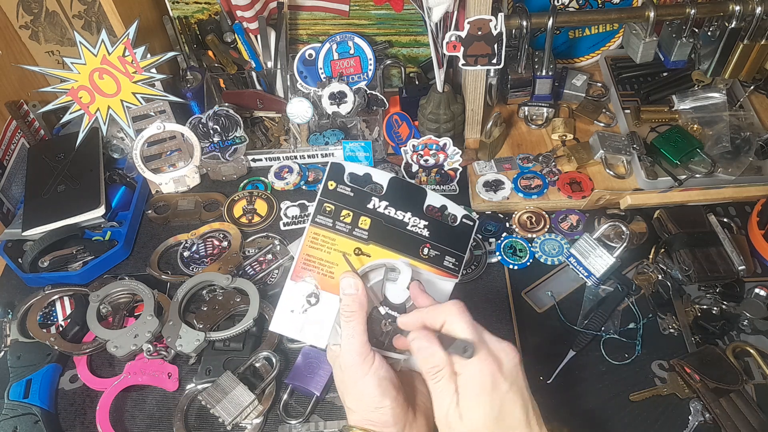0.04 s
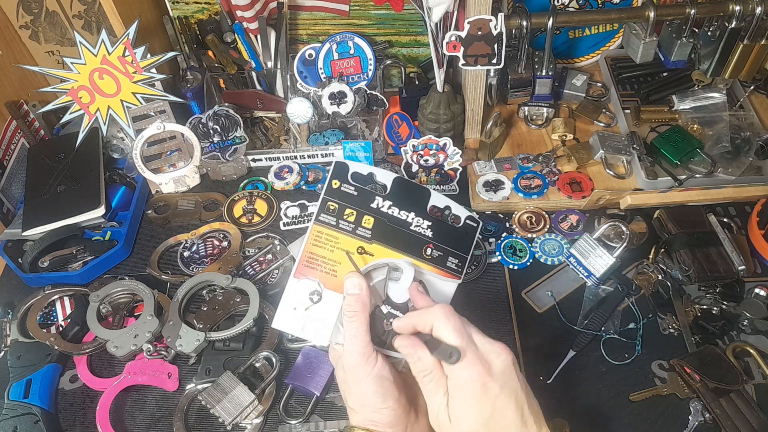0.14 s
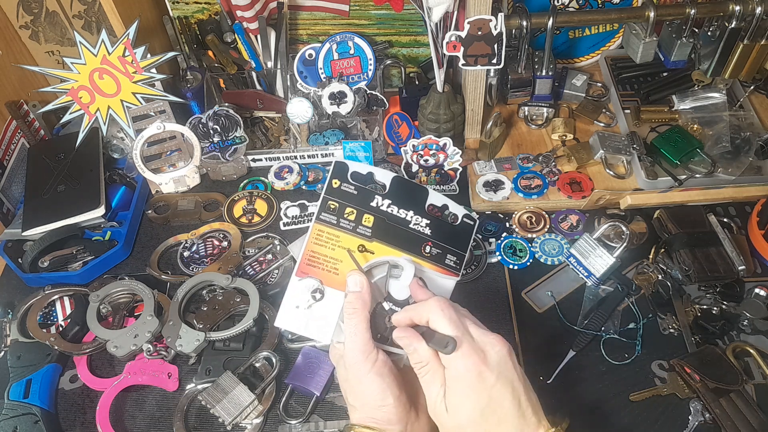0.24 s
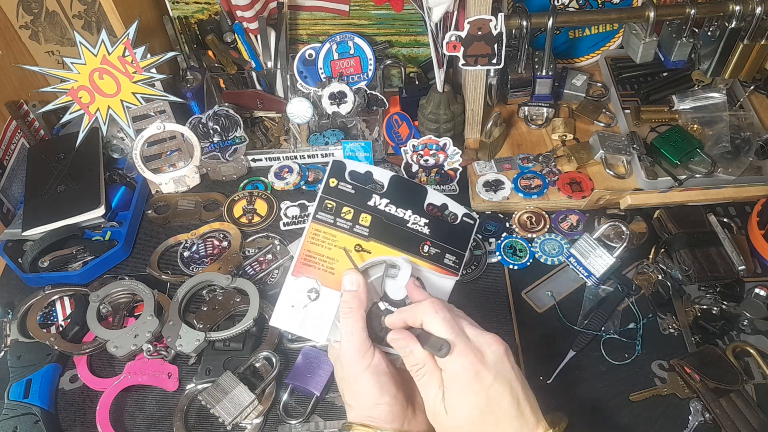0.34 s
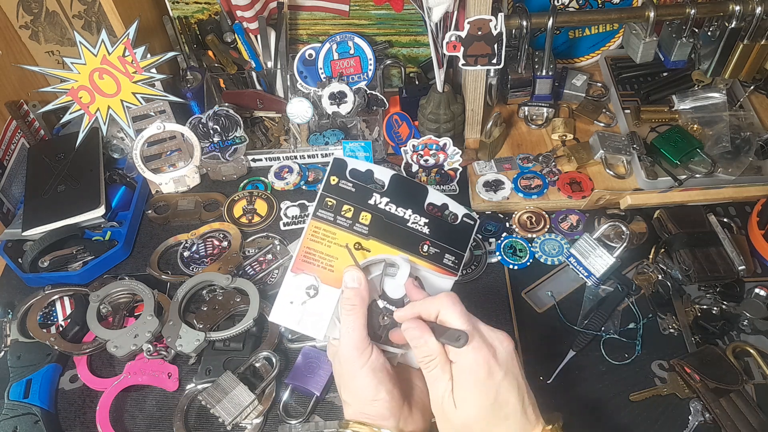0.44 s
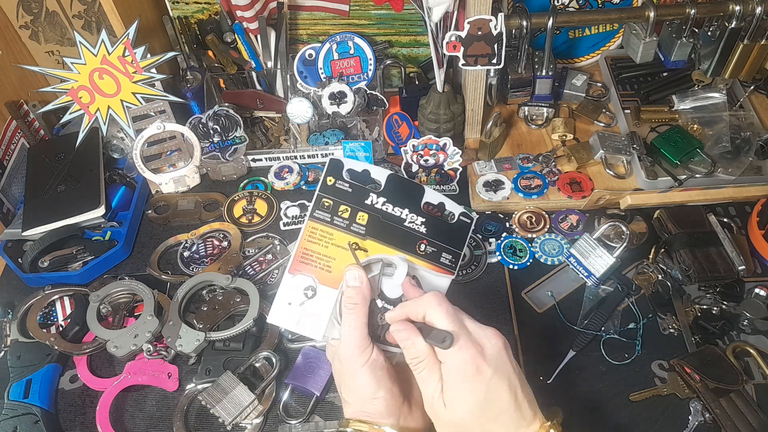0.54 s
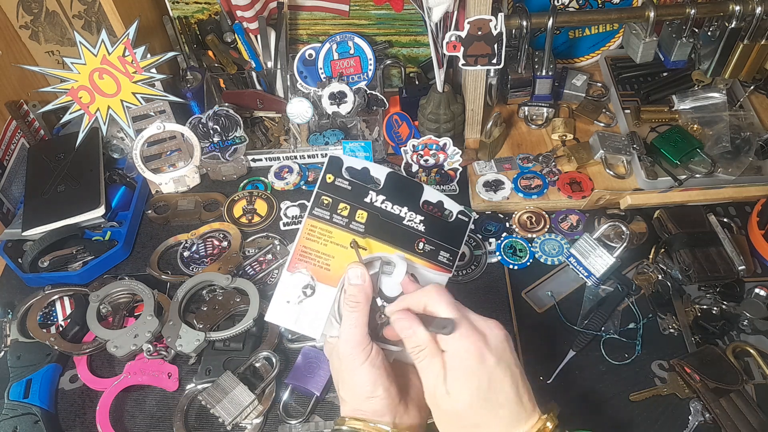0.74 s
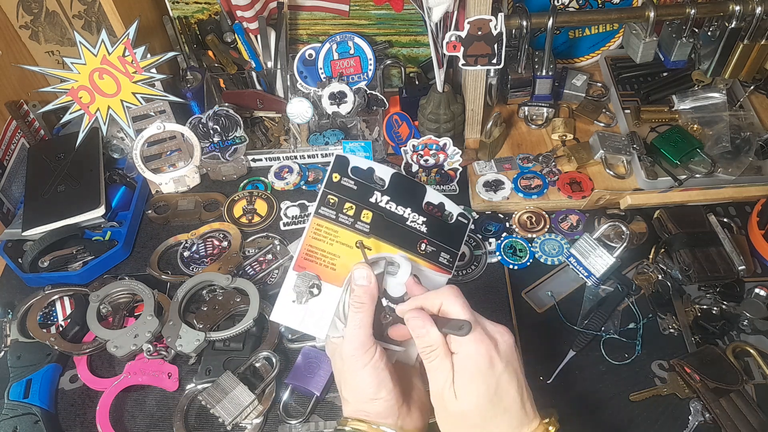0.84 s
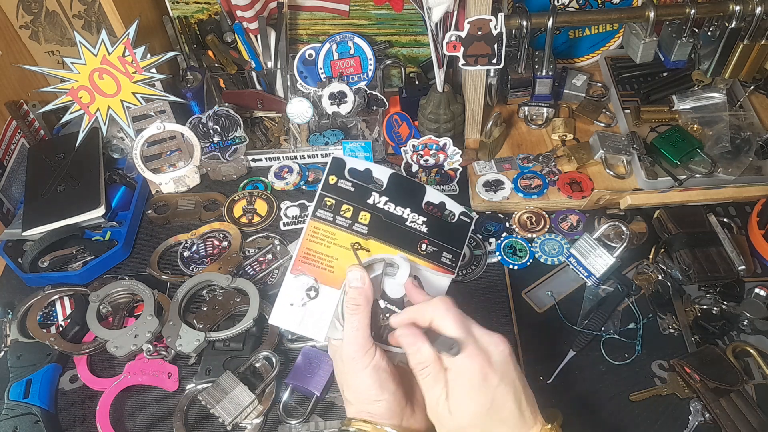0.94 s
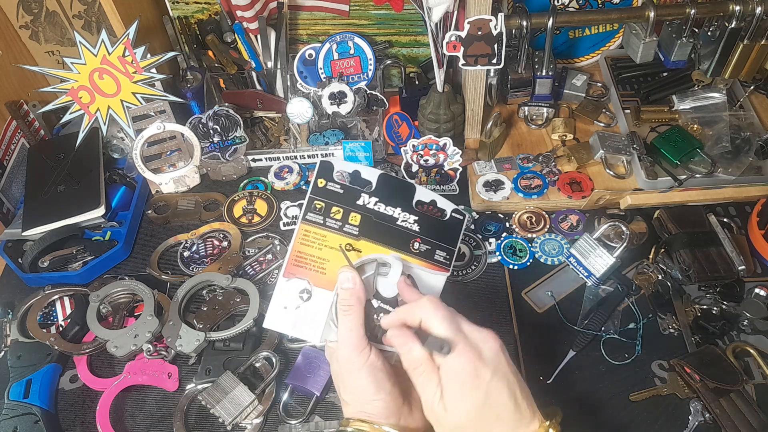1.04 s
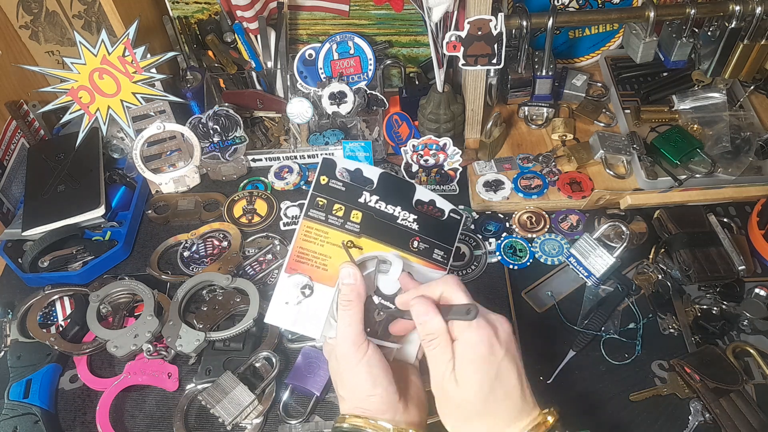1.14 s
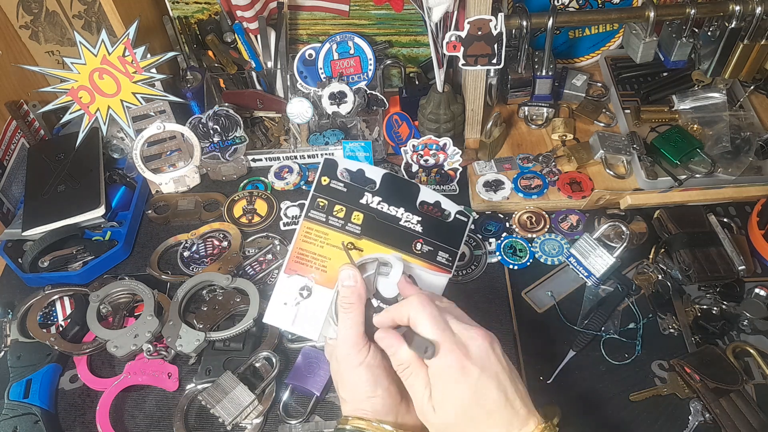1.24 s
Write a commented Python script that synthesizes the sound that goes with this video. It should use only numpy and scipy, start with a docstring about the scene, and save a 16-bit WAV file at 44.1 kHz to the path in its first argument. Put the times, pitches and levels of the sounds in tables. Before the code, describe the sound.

Pins snap and click inside a padlock as a metal pick scrapes over them in quick, irregular strokes, each ringing briefly. A tiny high squeak comes near the start, and hands rustle faintly on cardboard, close up indoors.

```python
"""A steel pick rakes through a hand-held padlock, close-miked in a small room.
Each stroke is a gritty stick-slip scrape over the pins, which snap back and ring the lock's body.
The pick gives one stuttering squeak, steel on steel, and ticks between strokes.
Underneath, hands rustle softly on the lock's card over a low hum and faint hiss."""
import sys
import numpy as np
from scipy import signal
from scipy.fft import rfft, irfft
from scipy.io import wavfile
from scipy.ndimage import uniform_filter1d

SR = 44100
rng = np.random.default_rng(int(sys.argv[2]) if len(sys.argv) > 2 else 0)


def wrap_up_sound(samples):
    """Save the sound to the file named by the first command line argument, as 16-bit audio."""
    columns = np.atleast_2d(samples).T
    # keep every value between -1 and 1, then stretch to whole-number steps
    tamed = np.clip(columns, -1, 1)
    steps = np.round(tamed * 32767).astype(np.int16)
    wavfile.write(sys.argv[1], SR, steps)


N = 57330

# EQ points of a contact, in the order low body, knock, body, treble, top: f/Hz
CONTACT_BANDS = (900, 2400, 3500, 7000, 13000)
# pick dragging over pins and wards: t/s, length/s, knock/dB, body/dB, treble/dB, top/dB, pan left/dB
PICK_DRAGS = [ (.000, 0.023, -57.5, -55, -51.5, -58.5, 4), (0.164, 0.006, -44.5, -55.5, -53, -58, 13),
              (0.177, 0.026, -53.5, -59, -58.5, -70, 2), (0.2128, 0.013, -34, -42.5, -38.5, -33, 3),
              (0.225, 0.0079, -13, -19, -24.5, -27.5, 3.5), (.246, 0.0111, -20.5, -30.5, -30.5, -47, 3.5),
              (.427, 0.024, -49.5, -58, -47, -46, 2), (0.4445, 0.0069, -33.5, -33, -35.5, -29, 6.5),
              (0.512, 0.015, -63, -78, -63, -62, 13), (0.595, 0.0089, -53, -63, -47.5, -59, 16.5),
              (0.628, 0.0056, -29, -52, -44, -46, -11), (0.6337, 0.0081, -14, -30, -32.5, -34, -2.5),
              (.650, 0.0278, -35.5, -26.5, -39.5, -58, -7.5), (0.808, 0.019, -44, -48.5, -44.5, -58, 4.5),
              (0.825, .006, -44, -49, -34, -41.5, -12), (.976, 0.0063, -32.5, -32.5, -28.5, -27, 5),
              (0.982, 0.0046, -28.5, -31, -29.5, -27.5, -0.5), (1.138, 0.042, -49.5, -62, -56, -65, 8)]
# ring of the lock and its shackle: f/Hz, level/dB
LOCK_PARTIALS = [(1760, -4.5), (2220, -32), (2335, -12), (2412, -6), (3204, -9.5), (3278, -12.5),
                 (3380, -9), (3662, -9), (3745, -12), (3898, -7), (5312, -1.5), (5586, -9), (6497, -23)]
# tone the lock gives every contact: f/Hz, level/dB
LOCK_EQ = [(60, -39), (250, -20.5), (400, -19), (540, -17), (760, -25), (1150, -13), (1800, -14.5),
           (2250, -5.5), (2750, -6), (3400, 0), (3850, -6.5), (4200, -8), (5500, -2.5), (7500, -5),
           (9500, -5.5), (12000, -1.5), (15200, -1.5)]
# room decay: f/Hz, T60/s
REVERB_DECAY = [(150, 0.7), (500, 0.02), (1400, 0.16), (3500, 0.14), (7000, 0.15), (14000, 0.11)]
# tone of the room's tail: f/Hz, level/dB
REVERB_EQ = [(150, -3), (500, 4.5), (1400, -2.5), (3500, -7.5), (7000, -6.5), (14000, -10.5)]
# envelope of the hand rustle: t/s, level/dB
RUSTLE_ENVELOPE = [(0, -63), (.06, -80), (.18, -73), (.26, -63.5), (.39, -80), (.48, -63), (.55, -65.5),
                   (.6, -76), (.68, -58), (.76, -72.5), (.83, -61.5), (.92, -78.5), (1.0, -64.5),
                   (1.11, -70.5), (1.2, -77), (1.3, -70.5)]
# tone of the hand rustle: f/Hz, level/dB
RUSTLE_EQ = [(20, -25), (50, 0), (95, -0.5), (135, -3.5), (180, 4), (230, -3.5), (330, -3), (520, -5),
             (800, -13.5), (2000, -13.5), (16000, -46)]
# swells of the low hum: t/s, level/dB
HUM_ENVELOPE = [(0, -15), (.15, -12.5), (.24, -8), (.32, -2.5), (.41, -11), (.5, 3.5), (.6, -15.5),
                (.68, -9), (.9, -15), (1.03, -14), (1.15, -34)]
# tone of the hiss: f/Hz, level/dB
HISS_EQ = [(18, -32), (30, 2), (324, 3), (830, -11.5), (2550, -9.5), (4660, -7), (5450, -6), (9680, -16),
           (15500, -9)]
# pulses of the steel-on-steel squeak: t/s, length/s, level/dB
SQUEAK_PULSES = [(0.083, 0.026, -58.5), (0.107, 0.019, -64), (0.126, 0.034, -56)]
# partials of the squeaking pick: f/Hz, level/dB
PICK_PARTIALS = [(7601, 3.5), (10196, -2)]
# pin snaps and pick ticks: t/s, knock/dB, body/dB, treble/dB, top/dB, pan left/dB
PIN_HITS = [ (.1641, -27, -28, -30, -17.5, 1.5), (0.2034, -25, -40, -27.5, -32, 6),
            (.2140, -18, -36, -25, -12, 7), (.2292, 5, -2, -3.5, -5, -0.5), (0.2297, 3, -13, -27, -63, -5),
            (0.2355, -17, -3, -16, -20, -5), (.2420, -9, 4.5, -1.5, -26, -1),
            (.2440, -4, -6.5, -9, -28, 18), (0.2459, -9.5, 5.5, -1.5, -12, -3.5),
            (0.3547, -46, -39, -39, -35, 11), (0.3882, -37, -33.5, -36.5, -35, 5),
            (0.4285, -25.5, -34, -34, -24, 3), (0.4385, -25, -33, -23, -8.5, 8),
            (0.449, -19, -19, -8, -5, 8.5), (0.4553, -11.5, 1.5, -13.5, -18, -1.5),
            (0.4576, -1, -6, -8, -24.5, 4.5), (0.5982, -16.5, -30.5, -14, -19.5, 4),
            (0.63, -31, -16.5, -19, -16, 11), (0.6337, -15, -16, -27, -1, 8),
            (0.6388, 4.5, 2.5, -3.5, -12, 8), (0.6393, -2, -1.5, -17, -17, 3),
            (0.6415, 0, -3.5, -6.5, -52, -14.5), (.6470, -10.5, 4.5, -12, -23, 6),
            (.6640, -3, 4.5, -12.5, -15, 9), (0.7785, -24.5, -28, -28.5, -34, 5.5),
            (0.809, -27, -23.5, -13.5, -23, -2), (.8239, -29, -43, -4.5, -14.5, 12),
            (0.9197, -15, -24.5, -17.5, -48, -2), (0.9227, -29.5, -22.5, -40, -45, 21),
            (0.9598, -22, -38, -33, -45.5, 19), (1.078, -35, -48, -21.5, -40, 6.5),
            (1.1416, -29, -39, -33.5, -28, 5), (1.1643, -36, -37, -18.5, -27, 1),
            (1.1798, -6.5, -22.5, -19.5, -34, 5), (1.2373, -17.5, -23, -14.5, -15.5, 5.5),
            (1.2506, -8, -17.5, -13.5, -10, 6), (1.2918, -27.5, -29, -39, -54, 14)]


def undb(db):
    """Decibels to gain."""
    return 10 ** (np.asarray(db) / 20)


def unit(x):
    """Normalise to an energy of one."""
    return x / np.sqrt(np.sum(x ** 2) + 1e-20)


def curve_at(points, hz):
    """Read (f/Hz, value) points on a log-frequency axis."""
    freqs, values = np.array(points, float).T
    return np.interp(np.log(np.maximum(hz, 1)), np.log(freqs), values)


def eq(x, points, size=2048):
    """Minimum-phase EQ through (f/Hz, level/dB) points."""
    gain = undb(curve_at(points, np.fft.rfftfreq(size, 1 / SR)))
    cepstrum = irfft(np.log(gain))
    cepstrum[1:size // 2] *= 2
    cepstrum[size // 2 + 1:] = 0
    return signal.fftconvolve(x, irfft(np.exp(rfft(cepstrum))))


def wander(rate_hz):
    """Smooth random modulation, depth near one."""
    step = max(int(SR / rate_hz), 2)
    return uniform_filter1d(np.repeat(rng.standard_normal(N // step + 1), step), step)[:N]


def stereo_noise(points, side_db):
    """EQ'd mid/side noise, the mid at an rms of one."""
    mid, side = (unit(eq(rng.standard_normal(N), points)[:N]) * np.sqrt(N) for _ in range(2))
    return mid + undb(side_db) * side * np.array([[1], [-1]])


def place_contact(out, start, force, band_dbs, pan_db):
    """Mix in one contact with its own EQ and pan; the hollow knock is a peak or dip in the body band."""
    i = max(int(start * SR), 0)
    knock_db, body_db, treble_db, top_db = band_dbs
    points = list(zip(CONTACT_BANDS, (body_db, knock_db, body_db, treble_db, top_db)))
    for ch, side in enumerate((1, -1)):
        contact = eq(force[ch], points)[:max(N - i, 0)]
        out[ch, i:i + len(contact)] += contact * undb(side * pan_db / 2)


def pick_scrapes(grain_db=3.5, rise_db=0.5, release_s=0.0025, width=1.17, size=2048):
    """Dense stick-slip grains that grow slightly as the pick presses on."""
    out, t = np.zeros((2, N)), np.arange(size) / SR
    for start, length, *band_dbs, pan_db in PICK_DRAGS:
        grip, centre, *sides = rng.standard_normal((4, size))
        grains = undb(grain_db * np.repeat(grip, 10)[:size])  # 10 samples a grain
        pressure = undb(rise_db * (np.minimum(t / length, 1) + 0.5))
        release = np.exp(-np.maximum(t - length, 0) / release_s)
        grit = np.array([unit(grains * (centre + width * side)) for side in sides]) * np.sqrt(size)
        place_contact(out, start, grit * pressure * release, band_dbs, pan_db)
    return out


def lock_body(contacts, ring_db=-21, t60_s=0.10):
    """The contacts sound through the lock's body and set its modes ringing."""
    t = np.arange(N // 2) / SR
    decay = np.exp(-np.log(1000) * t / t60_s)
    response = sum(undb(db + ring_db) * unit(np.cos(2 * np.pi * hz * t) * decay)
                   for hz, db in LOCK_PARTIALS)
    response[0] += 1  # the direct attack
    return np.array([eq(signal.fftconvolve(ch, response)[:N], LOCK_EQ)[:N] for ch in contacts])


def small_room(x, attack_s=0.0064, mono_below_hz=900, bands=30):
    """A short diffuse tail; its bass hangs longest and sits in the centre."""
    size = N // 3
    t, hz = np.arange(size) / SR, np.fft.rfftfreq(size, 1 / SR)
    edges = np.linspace(np.sqrt(40), np.sqrt(SR / 2), bands + 1) ** 2
    mid, side = rfft(rng.standard_normal((2, size)))
    width = hz / np.hypot(hz, mono_below_hz)
    spectrum = mid + side * width * np.array([[1], [-1]])
    attack = 1 - np.exp(-t / attack_s)
    tail = 0
    for lo, hi in zip(edges, edges[1:]):
        centre_hz = np.sqrt(lo * hi)
        decay = np.exp(-np.log(1000) * t / curve_at(REVERB_DECAY, centre_hz))
        band = irfft(spectrum * ((hz >= lo) & (hz < hi)), size)
        tail = tail + undb(curve_at(REVERB_EQ, centre_hz)) * unit(attack * decay) * band
    return signal.fftconvolve(x.mean(axis=0)[None], tail / np.sqrt(2), axes=1)[:, :N]


def hand_rustle():
    """Hands rub the lock's card in soft, dark swells of noise."""
    level_db = np.interp(np.arange(N) / SR, *np.array(RUSTLE_ENVELOPE).T)
    return undb(level_db) * stereo_noise(RUSTLE_EQ, side_db=-9)


def low_hum(hz=93.5, drift=0.023, trim_db=-66.5, waver_db=4):
    """A low sine that swells and wavers in pitch and level."""
    cycles = np.cumsum(hz * (1 + drift * wander(rate_hz=16.6))) / SR
    swell_db = np.interp(np.arange(N) / SR, *np.array(HUM_ENVELOPE).T)
    level_db = trim_db + swell_db + waver_db * wander(rate_hz=23.7)
    return undb(level_db) * np.sqrt(2) * np.sin(2 * np.pi * cycles)


def hiss(gain_db=-71):
    """A faint, wide bed of steady noise."""
    return undb(gain_db) * stereo_noise(HISS_EQ, side_db=0)


def pick_squeak(waver=0.0022):
    """Steel rubs on steel and the pick sings briefly at two high partials."""
    t = np.arange(N) / SR
    envelope = sum(undb(db) * np.sin(np.pi * np.clip((t - start) / length, 0, 1))
                   for start, length, db in SQUEAK_PULSES)
    wavering_t = np.cumsum(1 + waver * wander(rate_hz=240)) / SR
    return envelope * sum(undb(db) * np.sin(2 * np.pi * hz * wavering_t) for hz, db in PICK_PARTIALS)


def pin_clicks(hold_s=0.0007, crack_s=0.00037, chatter_s=0.0054, chatter_db=-4, size=1024):
    """Each pin snap or pick tick lands as a millisecond crack with a brief stereo chatter."""
    out, t = np.zeros((2, N)), np.arange(size) / SR
    crack_decay = np.exp(-np.maximum(t - hold_s, 0) / crack_s)
    chatter_decay = np.exp(-t / chatter_s)
    for start, *band_dbs, pan_db in PIN_HITS:
        burst, centre, *sides = rng.standard_normal((4, size))
        spectrum = rfft(burst * crack_decay)
        flattened = irfft(spectrum / np.sqrt(np.abs(spectrum) + 1e-9))  # evens out the burst's tone
        crack = unit(flattened * chatter_decay)
        chatter = np.array([unit((centre + side) * chatter_decay) for side in sides])
        place_contact(out, start, crack + undb(chatter_db) * chatter, band_dbs, pan_db)
    return out


def scene(right_lag_s=0.00003):
    """The lock up front, a touch nearer the left microphone, over room tail, rustle, hum and hiss."""
    lock = lock_body(pin_clicks() + pick_scrapes())
    left, right = lock + pick_squeak()
    delay = np.exp(-2j * np.pi * np.fft.rfftfreq(N, 1 / SR) * right_lag_s)
    direct = np.array([left, irfft(rfft(right) * delay, N)])
    return direct + small_room(lock) + hand_rustle() + low_hum() + hiss()


def record(dry, cutoff_hz=15900):
    """A steep low-pass shaves off the very top."""
    return signal.sosfilt(signal.ellip(8, .2, 70, cutoff_hz, fs=SR, output="sos"), dry)


dry = scene()
out = record(dry)
wrap_up_sound(out)
```